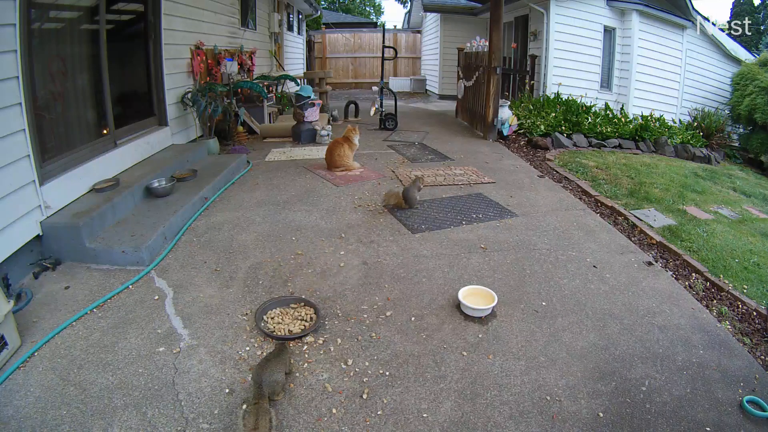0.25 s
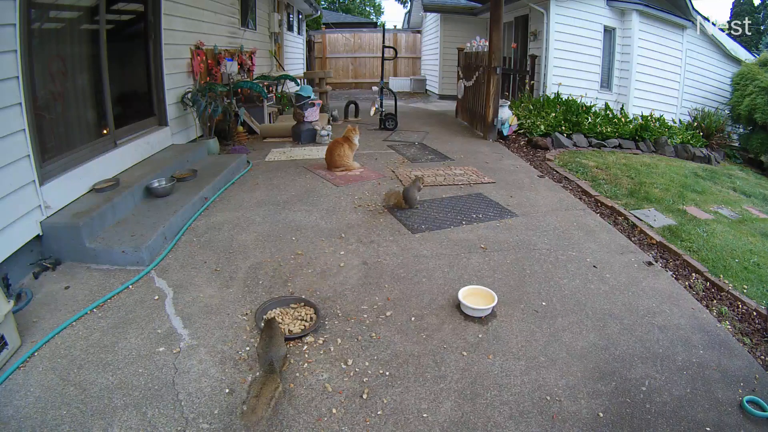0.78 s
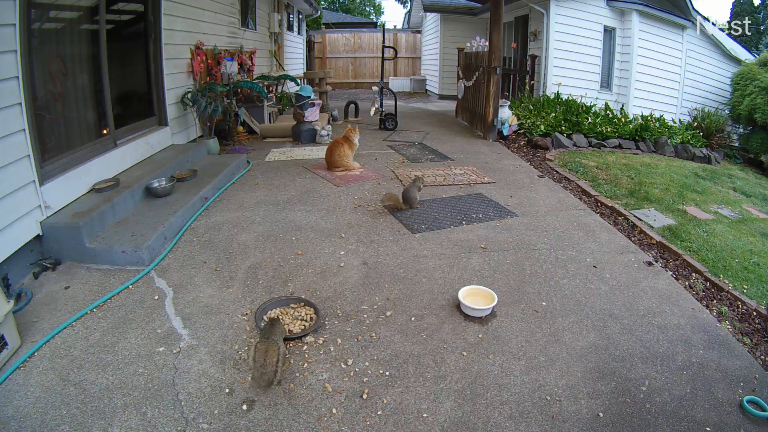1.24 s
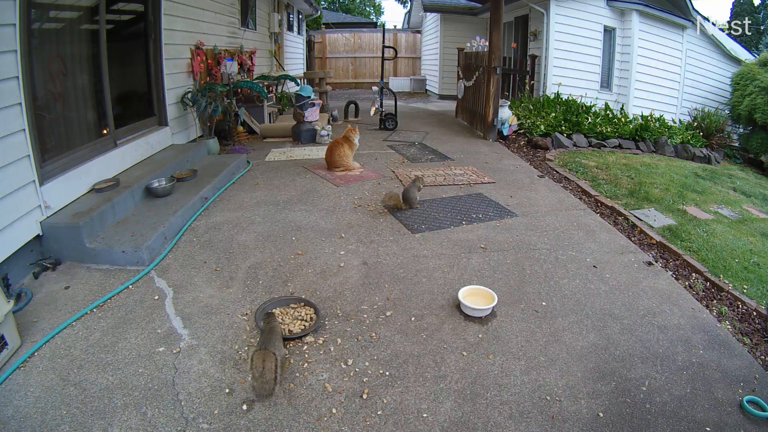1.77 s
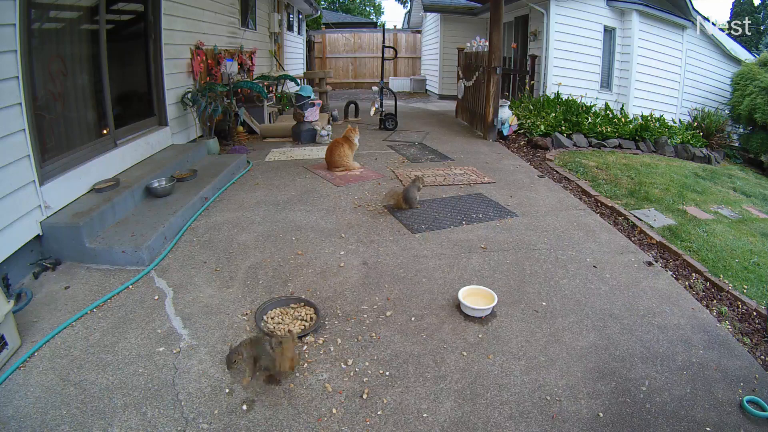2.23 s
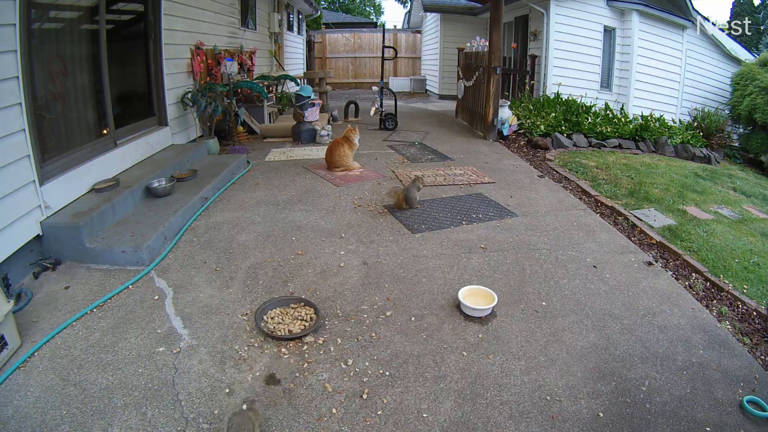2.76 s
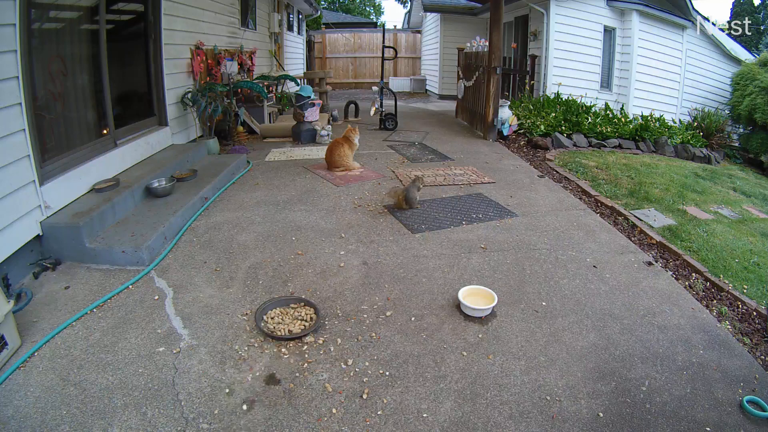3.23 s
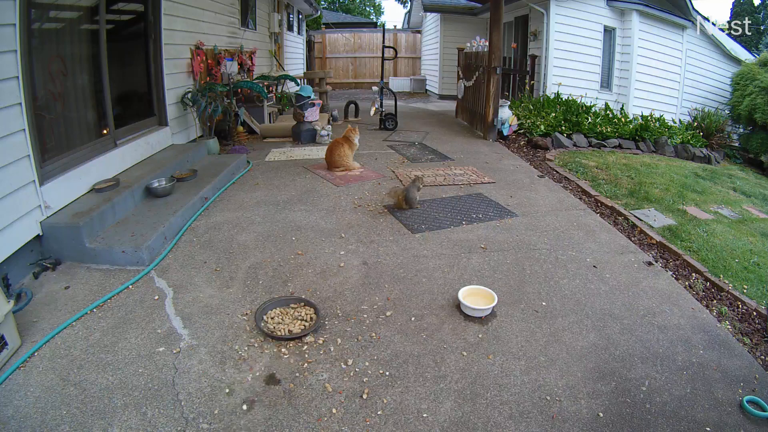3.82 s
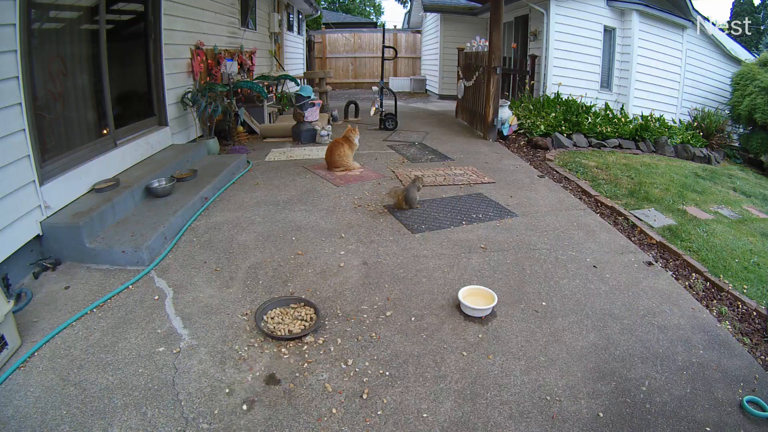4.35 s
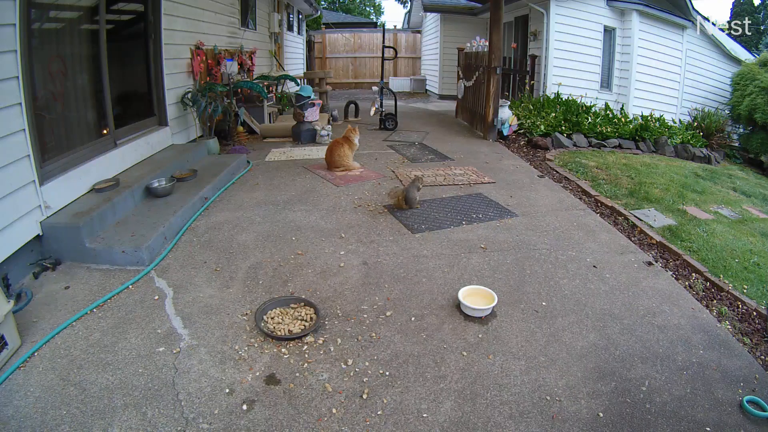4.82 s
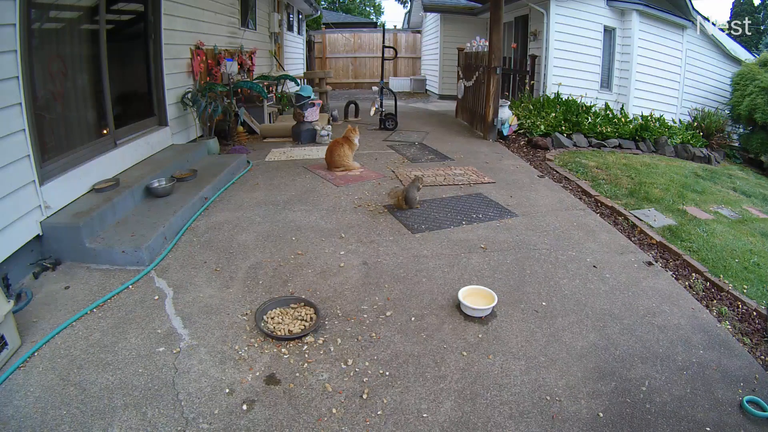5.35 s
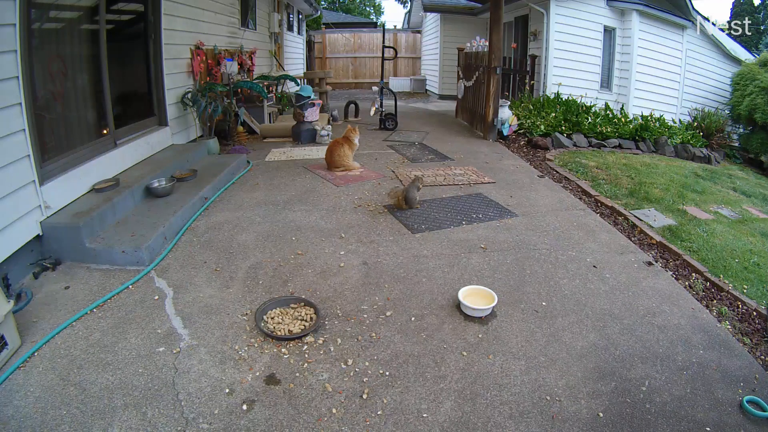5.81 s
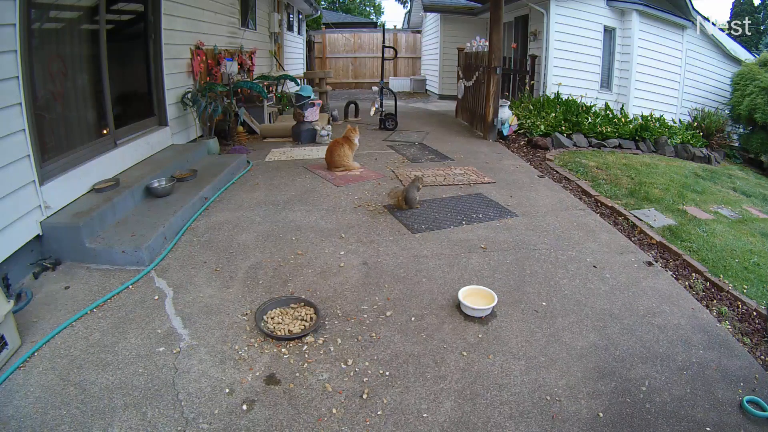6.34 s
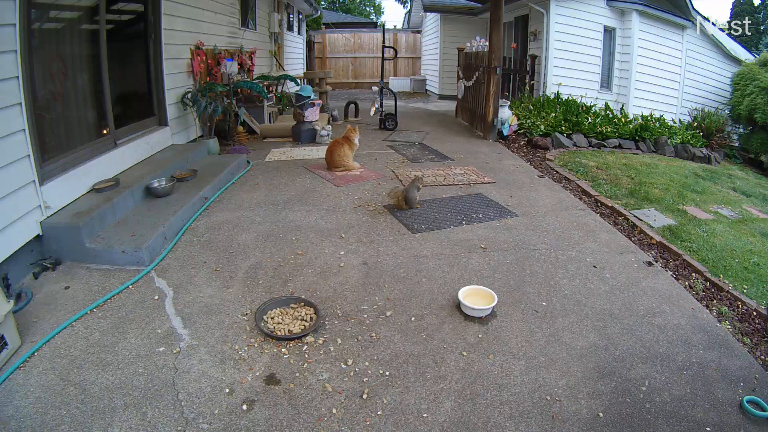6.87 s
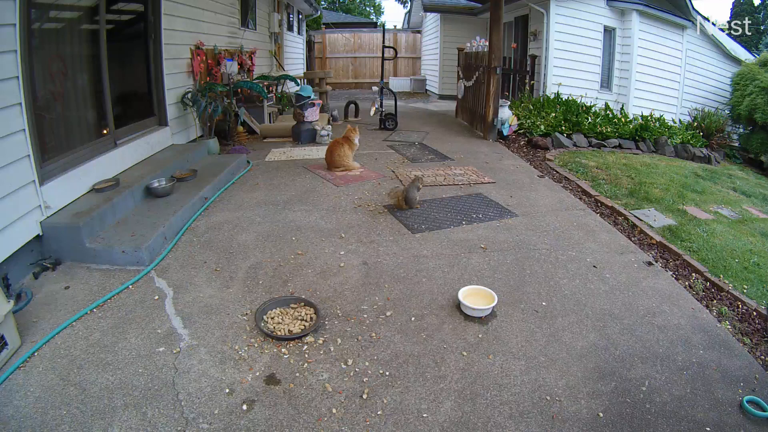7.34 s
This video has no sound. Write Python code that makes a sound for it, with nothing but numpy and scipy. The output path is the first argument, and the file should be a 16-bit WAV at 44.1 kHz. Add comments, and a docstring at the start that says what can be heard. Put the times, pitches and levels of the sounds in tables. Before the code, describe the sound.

A squirrel nudges nuts with light scrapes, then cracks a peanut shell in crisp snaps and gnaws it, over steady outdoor hiss on a patio.

```python
"""A squirrel cracks a peanut shell and gnaws it, after nosing through a dish of nuts on a concrete patio.
Each crack is a snap in a burst of tiny splinter clicks that ring a shell fragment; the hollow pod knocks.
Scrapes are longer swarms of such clicks; the husk rustles and crumbles as clumps of random fractures.
House walls answer with faint echoes. A coloured-noise wash with hiss, a rumble, a thin hum and a soft gust
lie behind, all within the narrow band of a small camera microphone."""
import sys
import numpy as np
from scipy import signal
from scipy.fft import rfft, irfft
from scipy.io import wavfile
from scipy.ndimage import uniform_filter1d

SR = 44100
rng = np.random.default_rng(int(sys.argv[2]) if len(sys.argv) > 2 else 0)


def generate_wav(sig):
    """Save sig (samples, or channels by samples) to the path in sys.argv[1] as 16-bit PCM at SR."""
    pcm = np.round(np.clip(np.atleast_2d(sig).T, -1, 1) * 32767).astype(np.int16)
    wavfile.write(sys.argv[1], SR, pcm)


N = 334710
TAPS = 2048  # length of a piece's response [samples]
HISS_EDGE_HZ = 6850  # cut-off of the wash, the scrapes and the quiet cracks and husk


def amp(db):
    """Level: decibels to amplitude gain."""
    return 10 ** (np.asarray(db) / 20)


def unit(x):
    """Normalisation: scales to rms 1."""
    return x / np.sqrt(np.mean(x ** 2) + 1e-20)


def colour(points, hz):
    """Spectral envelope: gain of a (frequency [Hz], level [dB]) table, interpolated over log frequency."""
    f, db = np.transpose(points)
    return amp(np.interp(np.log(hz + 1), np.log(f), db))


def level(points):
    """Temporal envelope: gain of a (time [s], level [dB]) curve at every sample."""
    return amp(np.interp(np.arange(N) / SR, *np.transpose(points)))


def tinted(x, points):
    """Spectral shaping: gives a long sound the colour of a spectrum table, at rms 1."""
    hz = np.fft.rfftfreq(N, 1 / SR)
    return unit(irfft(rfft(x) * colour(points, hz), N))


def ring(gain):
    """Minimum phase: the causal response that has this gain over frequency."""
    both_sides = np.r_[gain, gain[-2:0:-1]]
    log_gain = np.log(np.maximum(both_sides, 1e-5))
    return np.fft.ifft(np.exp(np.conj(signal.hilbert(log_gain)))).real


def drift(per_s):
    """Slow random modulation: smooth noise of rms 1 that changes about per_s times a second."""
    hz = np.fft.rfftfreq(N, 1 / SR)
    return unit(irfft(rfft(rng.standard_normal(N)) * np.exp(-(hz / per_s) ** 2), N))


def low_pass(x, hz):
    """Band limitation: a steep linear-phase filter."""
    taps = signal.firwin(401, hz, window=("kaiser", 8), fs=SR)
    return signal.oaconvolve(x, taps, "same")


def add(mix, s, sound):
    """Superposition: mixes a sound in at time s."""
    part = mix[round(s * SR):][:len(sound)]
    part += sound[:len(part)]


# steady outdoor wash with the microphone's hiss: (frequency [Hz], relative density [dB])
WASH_COLOUR = [(50, -63), (130, -29), (200, -9), (260, -4), (450, 0), (800, 1.5), (1150, 5.5), (1320, 0.5),
               (1750, -1), (2030, 2.5), (2650, -5), (3000, -4.5), (3600, -5.5), (4200, -11), (4450, -3),
               (4850, -12), (5300, 0), (5550, -3.5), (5800, -9.5), (6050, -7.5), (6800, -8.5)]
WASH_DB = -59.5
# low air rumble: (frequency [Hz], relative density [dB])
RUMBLE_COLOUR = [(35, -26.5), (65, -19.5), (100, 1), (150, -7.5), (230, -25.5), (600, -54)]
# thin hum of a distant machine: (frequency [Hz], level [dB rms])
HUM_TONES = [(362, -78), (445, -90.5), (468, -78), (680, -79), (1408, -74)]
# one soft low gust: (time [s], level [dB rms])
GUST_LEVEL = [(6.6, -96), (6.68, -66), (6.73, -53.5), (6.8, -60.5), (6.88, -69), (6.96, -76)]
# its colour: (frequency [Hz], relative level [dB])
GUST_SPECTRUM = [(40, -35.5), (110, -11.5), (250, -3), (520, 0.5), (1200, -4), (2200, -8), (4000, -39.5),
                 (7000, -57)]


def outdoors(swell_db=0.76, rumble_db=-92.0, lumps_db=7.5, hum_width_hz=7.1):
    """Coloured noise and narrow-band noise: swelling wash, lumpy rumble, wavering hum and gust."""
    wash = unit(low_pass(tinted(rng.standard_normal(N), WASH_COLOUR), HISS_EDGE_HZ))
    wash *= amp(WASH_DB + swell_db * drift(0.31))
    rumble = tinted(rng.standard_normal(N), RUMBLE_COLOUR) * amp(lumps_db * drift(9.9))
    rumble = unit(rumble) * amp(rumble_db)
    turn = 2 * np.pi * np.arange(N) / SR
    hum = np.zeros(N)
    for hz, db in HUM_TONES:
        # two drifting quadrature parts make amplitude and phase wander
        in_phase = drift(hum_width_hz) * np.cos(hz * turn)
        quadrature = drift(hum_width_hz) * np.sin(hz * turn)
        hum += amp(db) * (in_phase + quadrature)
    gust = level(GUST_LEVEL) * tinted(rng.standard_normal(N), GUST_SPECTRUM)
    return wash + rumble + hum + gust


def flicker(x, depth_db=29.5, onset=0.41):
    """Time-frequency modulation: thin treble strands sink for a while as gain stays even across bands."""
    hz, _, z = signal.stft(x, SR, nperseg=2048, noverlap=1536)
    chance = uniform_filter1d(rng.standard_normal(z.shape), size=20, axis=1)
    narrow = uniform_filter1d(uniform_filter1d(chance, size=3, axis=0), size=3, axis=0)
    broad = uniform_filter1d(chance, size=15, axis=0)
    strands = unit(narrow - .7 * broad)
    treble = np.interp(hz, [1300, 4500], [0, 1])[:, None]
    dips = amp(depth_db * treble * np.minimum(strands - onset, 0))
    # neighbouring strands make up for the power lost
    dips /= np.sqrt(uniform_filter1d(dips ** 2, size=45, axis=0) + 1e-9)
    return signal.istft(z * dips, SR, nperseg=2048, noverlap=1536)[1][:N]


# early echoes from eaves and wall: (delay [s], level re direct sound [dB])
EARLY_ECHOES = [(.005, -12.5), (0.0128, -15.5)]


def patio(x, tail_db=-19.5, t60=1.0, scatter_db=-8.0, scatter_t60=0.034):
    """Reflection and decay: direct sound, echoes, quick scatter from slab and siding, open-air tail."""
    t = np.arange(SR // 2) / SR
    response = np.zeros(len(t))
    for db, decay in [(tail_db, t60), (scatter_db, scatter_t60)]:
        build_up = 1 - np.exp(-t / 0.0011)
        tail = rng.standard_normal(len(t)) * amp(-60 * t / decay) * build_up
        response += amp(db) * tail / np.linalg.norm(tail)
    response[0] = 1
    for delay, db in EARLY_ECHOES:
        add(response, delay, amp([db]))
    return signal.oaconvolve(x, response)[:N]


# resonances that all pieces of the nut share: (frequency [Hz], lift [dB])
SHARED_MODES = [(2170, 2.5), (3095, 5.5), (3287, 2.5), (3364, 5.5), (3488, 3), (3587, 5.5), (3932, 5),
                (4123, 6.5), (4748, 8), (4900, 2.5), (5299, -1.5), (5462, 3.5), (5583, 3), (6397, -3),
                (6750, 4.5)]
NUT_HALF_WIDTH_HZ = 16


def uneven(hz, scatter_db=3.5):
    """Modal response: every piece shares the ring of the nut and has random resonances of its own."""
    shared_db = sum(db / (1 + ((hz - mode_hz) / NUT_HALF_WIDTH_HZ) ** 2) for mode_hz, db in SHARED_MODES)
    own = unit(uniform_filter1d(rng.standard_normal(len(hz)), size=8))
    return amp(shared_db + scatter_db * own)


def soften(x, loudness):
    """Level-dependent low-pass: quiet sounds stop at HISS_EDGE_HZ, loud ones keep the fizz above it."""
    soft = low_pass(x, HISS_EDGE_HZ)
    return soft + np.minimum(loudness, 1) * (x - soft)


# faint nibbling throughout: level, how far it wanders and how often per second
NIBBLE_DB, NIBBLE_WANDER_DB, NIBBLE_PER_S = -73, 4.5, 4.0
# the long crunch as the shell is crushed open: (time [s], level of the husk [dB])
CRUNCH_LEVEL = [(3.69, -90), (3.73, -54), (3.875, -53.5), (3.955, -42.5), (3.995, -44.5), (4.05, -40.5),
                (4.135, -46.5), (4.22, -56.5), (4.28, -55), (4.335, -52), (4.4, -55), (4.46, -81)]
# rustles of husk as a nut is handled: (start [s], length [s], level at full swell [dB])
HUSK_RUSTLES = [(0, 0.114, -66.5), (0.866, 0.045, -63), (1.59, 0.27, -61), (1.96, 0.089, -66),
                (2.111, 0.0091, -52), (2.81, 0.35, -63), (3.414, 0.028, -73), (4.596, 0.079, -54.5),
                (4.763, 0.018, -53.5), (4.843, 0.15, -63), (5.54, 0.22, -65), (6.473, 0.02, -61.5),
                (6.632, 0.15, -64.5), (6.972, 0.13, -60)]
RUSTLE_ATTACK_S, RUSTLE_RELEASE_S = 0.026, 0.053  # linear rise, time constant of the decay


def handling():
    """Power addition: the level of the husk under nibbling, short rustles and the long crunch."""
    t = np.arange(N) / SR
    power = amp(NIBBLE_DB + NIBBLE_WANDER_DB * drift(NIBBLE_PER_S)) ** 2
    crunching = (t > CRUNCH_LEVEL[0][0]) * (t < CRUNCH_LEVEL[-1][0])
    power += (level(CRUNCH_LEVEL) * crunching) ** 2
    for start, length, db in HUSK_RUSTLES:
        attack = np.clip((t - start) / RUSTLE_ATTACK_S, 0, 1)
        release = np.exp(-np.maximum(t - start - length, 0) / RUSTLE_RELEASE_S)
        power += (amp(db) * attack * release) ** 2
    return np.sqrt(power)


# colour of the rustling husk: (frequency [Hz], relative level [dB])
HUSK_COLOUR = [(300, -61), (1200, -24), (2200, -11.5), (2800, -13), (3300, -3.5), (4200, -3), (4900, -2),
               (5350, 2), (6000, -7.5), (6800, -2.5), (7500, -11.5), (8600, -29)]


def husk(grains_per_s=2400, spread_db=3.5, fizz_from_db=-47.0, clump_db=0.5, clumps_per_s=160, count=8):
    """Crackling noise: clumps of random tiny fractures, a few large, each on one of several flakes."""
    hz, out = np.fft.rfftfreq(TAPS, 1 / SR), np.zeros(N)
    for _ in range(count):
        flake = ring(colour(HUSK_COLOUR, hz) * uneven(hz))
        sizes = amp(spread_db * np.minimum(rng.exponential(1, N), 4)) * rng.choice([-1., 1.], N)
        fractures = rng.random(N) < grains_per_s / count / SR
        out += signal.oaconvolve(sizes * fractures, flake)[:N]
    out *= amp(clump_db * drift(clumps_per_s))
    loudness = handling()
    return unit(soften(out, loudness / amp(fizz_from_db))) * loudness


def registers(db, hollow_db, bright_db):
    """Power division: splits a level into body, middle and edge, the edge bright_db above the middle."""
    middle_db = db - 10 * np.log10(1 + amp(bright_db) ** 2)
    return db + hollow_db, middle_db, middle_db + bright_db


# colour of a breaking shell, before its registers are levelled: (frequency [Hz], relative level [dB])
SHELL_COLOUR = [(150, -58), (400, -34), (750, -11.5), (1500, -8), (2200, 1.5), (2800, -4.5), (3100, 9.5),
                (3500, 5.5), (4250, -1), (4650, -1), (5450, 3), (6100, 0), (6800, 0.5), (7400, -7.5),
                (8000, -47.5), (8700, -35.5)]


def fragment(body_db, middle_db, edge_db, ring_hz, ring_db=13.5, ring_width_hz=220, body_trim_db=-5.0,
             scatter_db=3.0):
    """Resonance of one piece of shell: body power sounds hollow, edge power bright."""
    hz = np.fft.rfftfreq(TAPS, 1 / SR)
    main_ring = amp(ring_db / (1 + ((hz - ring_hz) / ring_width_hz) ** 2))
    gain = colour(SHELL_COLOUR, hz) * uneven(hz, scatter_db) * main_ring
    # each of three registers is brought to its own power
    bands = [(600, 2600), (2800, 4200), (4400, 7500)]  # [Hz]
    lifts = []
    for (lo, hi), db in zip(bands, [body_db + body_trim_db, middle_db, edge_db]):
        band_power = np.sum(gain[(hz > lo) & (hz < hi)] ** 2) / len(hz)
        lift_db = db - 10 * np.log10(band_power)
        lifts += [(lo, lift_db), (hi, lift_db)]
    return ring(gain * colour(lifts, hz))


LEAD = .03  # time before the peak of a swarm [s]


def splinters(piece, rise, fade, per_s, lasts, spread_db):
    """Random impulse excitation: a swarm of clicks rings the piece, fading in and out around LEAD."""
    t = np.arange(SR // 8) / SR - LEAD
    clicks = rng.choice([-1., 1.], len(t)) * (rng.random(len(t)) < per_s / SR)
    clicks *= amp(spread_db * np.minimum(rng.exponential(1, len(t)), 3))
    envelope = np.exp(-abs(t) / np.where(t < 0, rise, fade))
    sound = signal.fftconvolve(clicks * envelope, piece)
    # the energy is that of the piece's level held for "lasts" seconds
    return sound * np.linalg.norm(piece) * np.sqrt(lasts * SR) / np.linalg.norm(sound)


# scrapes of shell on shell or concrete: (time [s], fade time constant [s], level [dB],
# hollow body re level, before the body trim [dB], edge re middle [dB], main resonance [Hz])
SHELL_SLIPS = [(0.119, 0.039, -47, -23, 25, 5720), (1.069, 0.012, -46, -7, 10, 4170),
               (1.565, 0.0075, -45.5, -1, 1, 3930), (1.57, 0.0019, -49, 4, 12, 6000),
               (1.578, 0.0024, -42, -2, 5, 5200), (1.587, 0.0022, -48, -6, 5, 5240),
               (1.597, 0.013, -48, -3, -2, 5540), (1.828, 0.0098, -52.5, -8, -5, 3680),
               (1.943, 0.0068, -38.5, -9.5, 19, 5280), (1.9577, 0.0024, -41, -7, 18, 4560),
               (1.962, 0.003, -36, -22, 4, 5420), (1.9686, 0.0018, -44.5, -9, 0, 3150),
               (1.9774, 0.0039, -40, -17, 18, 5280), (1.994, 0.023, -38, -14, 8, 5140),
               (2.133, 0.0073, -44.5, -10, 17, 4750), (2.152, 0.0056, -47, -9, 22, 5170),
               (3.383, 0.007, -41.5, -2, 8, 5870), (3.436, 0.015, -43.5, -17, 8, 5400),
               (3.531, 0.0048, -45.5, -10, 2.5, 5470), (3.706, 0.002, -42.5, -7, 1, 6340),
               (3.772, .009, -49, -9, 21, 4900), (4.638, 0.005, -50, -19, 15, 4600),
               (4.672, 0.004, -52, -6, 13, 5440), (4.815, 0.011, -49, -1, 8, 4650),
               (4.912, 0.013, -47, -16, 17, 5410), (5.033, .014, -56, -15, 25, 5500),
               (5.385, 0.007, -48.5, -9, -15, 3090), (5.398, 0.0042, -54, -10, 26, 5470),
               (5.578, 0.017, -54, 1, -6.5, 3500), (5.647, 0.007, -53.5, -12, 31, 5340),
               (5.7, .003, -57, -3, 3, 3450), (5.72, .007, -52, -13, 0, 3540),
               (5.91, 0.0045, -43, -8, 1, 5070), (7.079, 0.051, -46, -30, 17, 5310),
               (7.16, 0.032, -54.5, -19, 22, 5250)]


def shell_scrapes(touch_db=-18.5, rise_share=1.1, longest_rise=0.0061):
    """Random slip impulses: nuts nudged and turned, a light touch in a swarm of slips, cut at HISS_EDGE_HZ."""
    out = np.zeros(N)
    for s, fade, db, hollow_db, bright_db, hz in SHELL_SLIPS:
        powers = registers(db, hollow_db, bright_db)
        piece = fragment(*powers, hz, ring_db=17.0, ring_width_hz=150, scatter_db=5.0)
        rise = min(rise_share * fade, longest_rise)
        slips = splinters(piece, rise=rise, fade=fade, per_s=1300, lasts=0.0048, spread_db=2.0)
        add(out, s - LEAD, slips)
        add(out, s, amp(db + touch_db) * piece / abs(piece).max())
    return low_pass(out, HISS_EDGE_HZ)


# the whole pod gives way under the hardest bites: (time [s], peak level [dB])
POD_KNOCKS = [(3.4055, -49), (3.4108, -49), (3.887, -48), (3.8962, -46)]
# the hollow of the pod: (frequency [Hz], relative level [dB], t60 [s])
POD_MODES = [(484, -17, .018), (730, 9, 0.032), (975, -4, 0.018)]


def pod_knocks():
    """Damped cavity modes: the hollow pod rings briefly when its wall caves in."""
    out, t = np.zeros(N), np.arange(SR // 16) / SR
    knock = sum(amp(db - 60 * t / t60) * np.sin(2 * np.pi * hz * t) for hz, db, t60 in POD_MODES)
    for s, db in POD_KNOCKS:
        add(out, s, amp(db) * knock / abs(knock).max())
    return out


# colour of the dry snap as the shell parts: (frequency [Hz], relative level [dB])
SNAP_COLOUR = [(200, -45), (800, -12), (2200, -3), (5300, 10), (7000, 7), (8000, -22), (8800, -9.5)]


def crack(db, snap_db, piece):
    """Impulsive fracture: a short swarm of clicks fades in and out around one dry snap."""
    sound = splinters(piece, rise=0.0027, fade=0.0013, per_s=5500, lasts=0.0015, spread_db=0.0)
    snap = ring(colour(SNAP_COLOUR, np.fft.rfftfreq(TAPS, 1 / SR)))
    add(sound, LEAD, amp(db + snap_db) * snap / abs(snap).max())
    return sound


# a crack is brighter when the fragment is smaller (higher) and the bite is harder (louder);
# treble and middle are even at EVEN_HZ and EVEN_DB
EVEN_HZ, EVEN_DB, BRIGHT_DB_PER_OCTAVE, BRIGHT_DB_PER_DB = 3690, -26, 22.5, 0.51
# shell cracks: (time [s], level [dB], hollow body re level, before the body trim [dB],
# main resonance of the fragment [Hz], peak of the snap re level [dB])
SHELL_BREAKS = [(1.889, -47.5, -2, 3360, -8), (2.566, -49, -19, 3640, -4), (2.915, -50.5, -2, 3870, -4),
                (3.113, -54, -6, 3730, -5), (3.288, -49.5, -10, 3640, -18), (3.3634, -39, 1, 5640, -6),
                (3.3969, -35.5, 0, 3270, 10.5), (3.4047, -25.5, -5, 4890, 4.5),
                (3.4108, -24.5, -6.5, 4770, -6), (3.413, -27, -12, 3330, 4),
                (3.4186, -31.5, -7.5, 4550, -1), (3.564, -40.5, -10.5, 5870, -8),
                (3.7133, -35, -2.5, 3370, -4), (3.7186, -36, -12, 5830, 6), (3.7484, -30.5, -12, 4870, 2.5),
                (3.753, -35.5, 0.5, 5000, 5), (3.76, -43, -3, 5000, -5), (3.849, -48, 8, 3720, -10),
                (3.8848, -25, -11, 5650, -6), (3.8872, -23.5, -5, 3430, -9),
                (3.8961, -23.5, -2, 3320, -1.5), (3.9, -37, -7, 5270, 0), (3.923, -36, -8, 5460, -6),
                (3.9282, -27, -9.5, 3420, 2), (3.9337, -31, -13, 5450, 6), (3.938, -35.5, -8, 5700, 7),
                (3.9468, -34, -15, 3220, 4), (3.9515, -35, -6, 3670, 10), (3.9551, -31, -8, 3420, 0),
                (3.9666, -37, -4, 5530, 4), (3.9755, -35.5, -10, 3840, -2), (4.008, -31, -28, 4000, -3),
                (4.023, -30, -17, 3920, -6), (4.0277, -24, -13.5, 3780, 4), (4.0339, -34.5, -24, 4840, 10),
                (4.0378, -34, -8, 4670, 1), (4.064, -28.5, -12.5, 5460, -2), (4.074, -25, -14.5, 5320, -7),
                (4.0795, -36, -10, 5540, -3), (4.125, -40, -5, 5500, -7), (4.1485, -29, -14.5, 5500, -4),
                (4.155, -40, -15, 5420, -2), (4.219, -50, -1, 3900, -3), (4.248, -50, 7, 3400, 2),
                (4.289, -39, -11, 3330, -4), (4.299, -48, -8, 3400, -6), (4.342, -50, -9, 3380, -1),
                (4.8, -38, -4.5, 4430, -10), (5.395, -39.5, 5, 3340, 2), (5.411, -46, -4, 3200, -11),
                (5.563, -47.5, -1, 3700, -3), (5.652, -58, 2, 5350, 2), (5.708, -39, -3.5, 3300, -19),
                (5.739, -60, -7, 3500, 3), (5.907, -33.5, -11, 3170, -2), (5.918, -49, -3, 3230, 5),
                (5.921, -50, -16, 5200, -5), (6.219, -43.5, -5, 3770, -23), (7.279, -45.5, 4.5, 3300, 4),
                (7.379, -46.5, 2.5, 3260, -5)]


def shell_cracks(fizz_from_db=-39.0):
    """Spectral scaling: bites split the shell, brighter when high or loud; quiet ones lose the top fizz."""
    out = np.zeros(N)
    for s, db, hollow_db, hz, snap_db in SHELL_BREAKS:
        bright_db = BRIGHT_DB_PER_OCTAVE * np.log2(hz / EVEN_HZ) + BRIGHT_DB_PER_DB * (db - EVEN_DB)
        piece = fragment(*registers(db, hollow_db, bright_db), hz)
        sound = crack(db, snap_db, piece)
        add(out, s - LEAD, soften(sound, amp(db - fizz_from_db)))
    return out


def scene():
    """Superposition: the squirrel's noises on the patio, over the outdoor background."""
    background = flicker(patio(husk()) + outdoors())
    nuts = patio(shell_cracks() + pod_knocks() + shell_scrapes())
    return (nuts + background)[None]


def record(dry, edge_hz=8800):
    """Band limitation: the camera microphone's narrow band."""
    return low_pass(dry[0], edge_hz)[None]


dry = scene()
out = record(dry)
generate_wav(out)
```